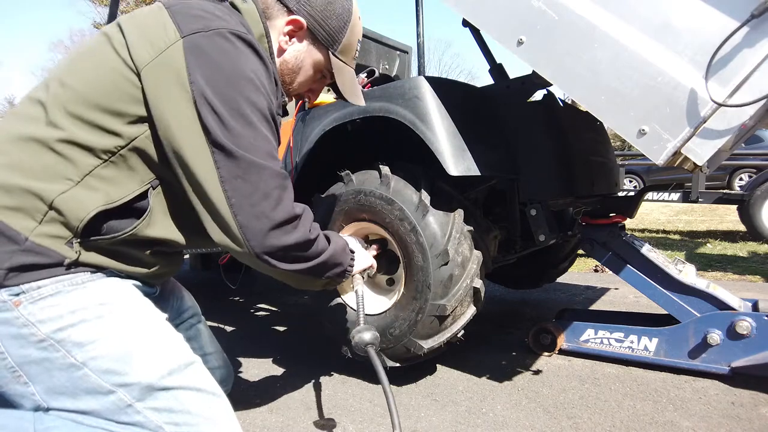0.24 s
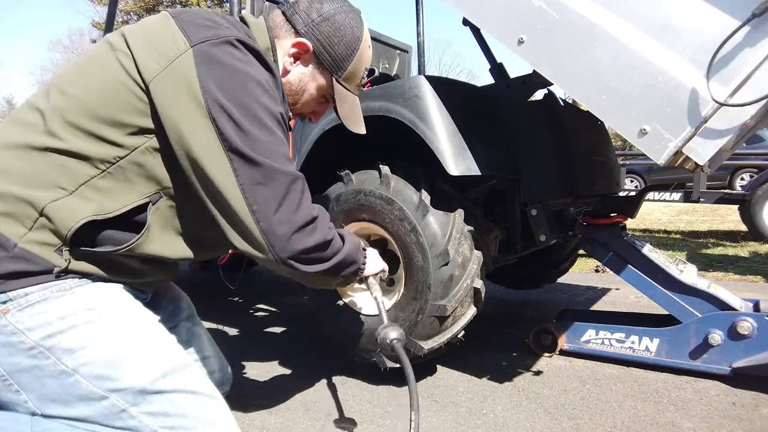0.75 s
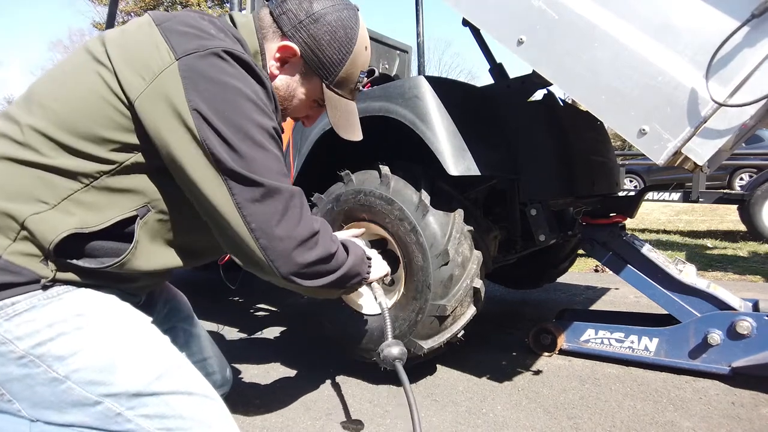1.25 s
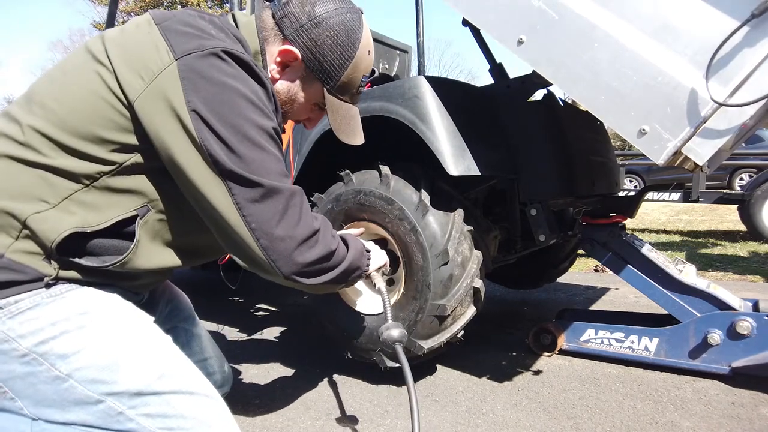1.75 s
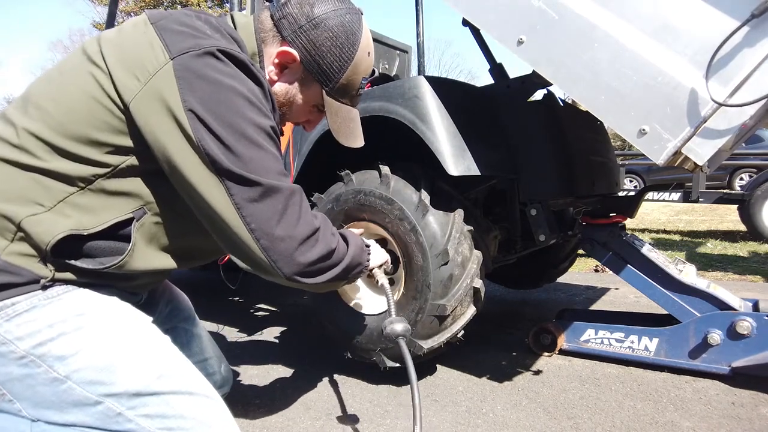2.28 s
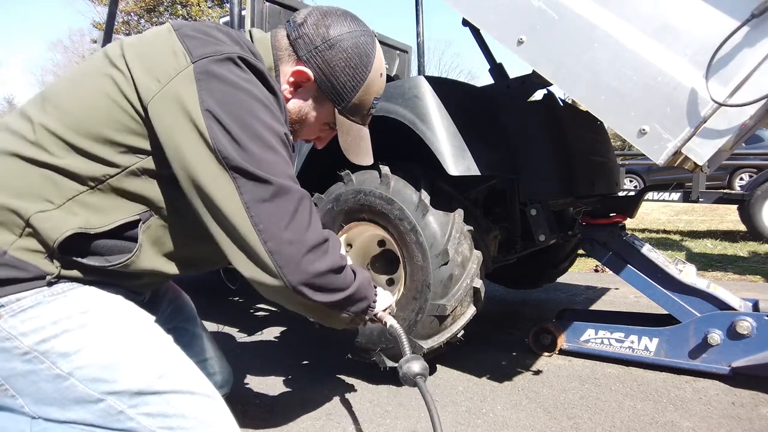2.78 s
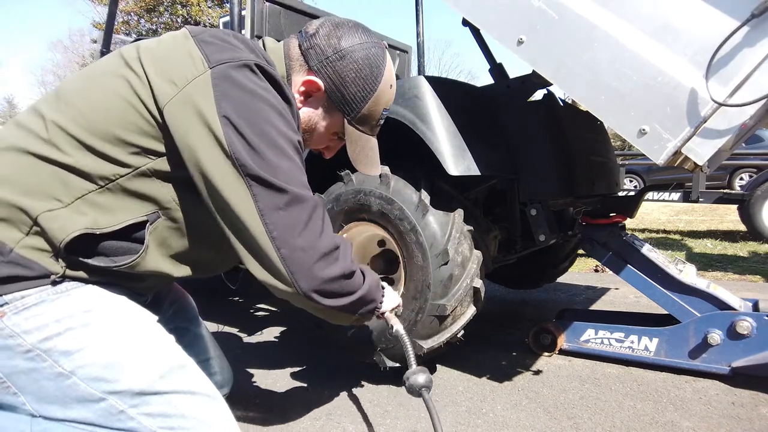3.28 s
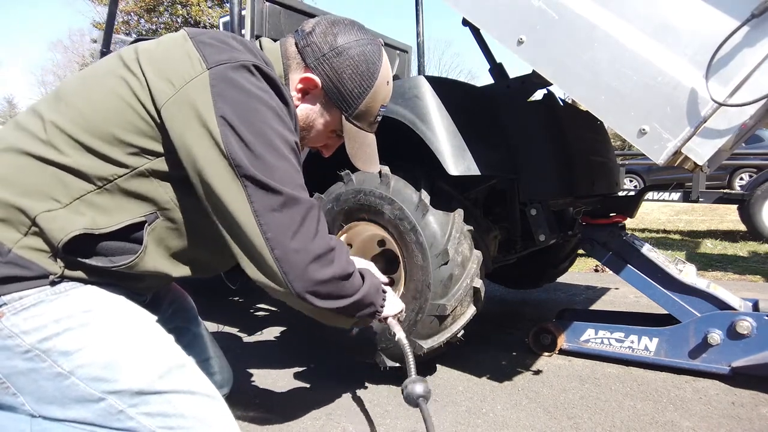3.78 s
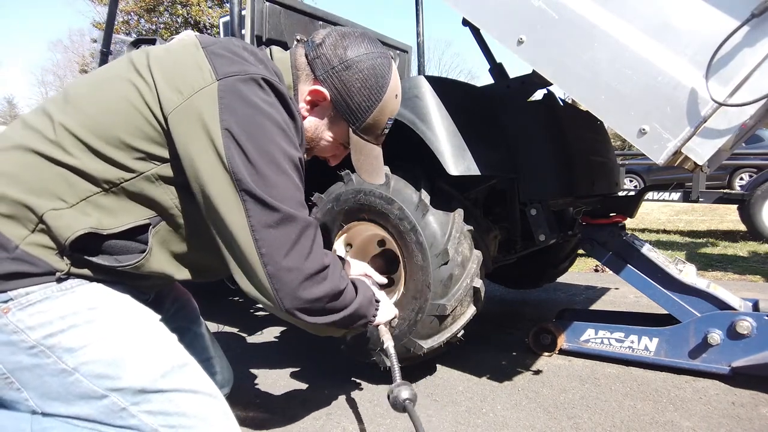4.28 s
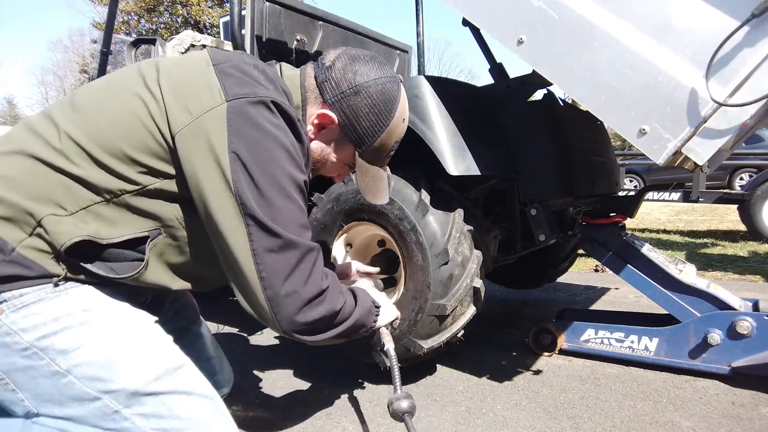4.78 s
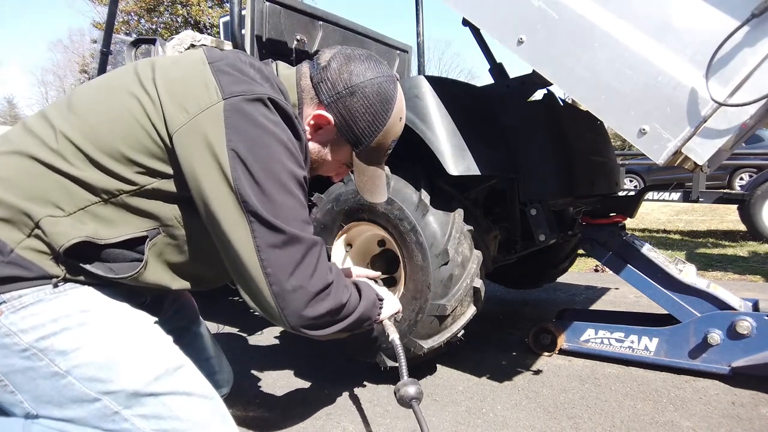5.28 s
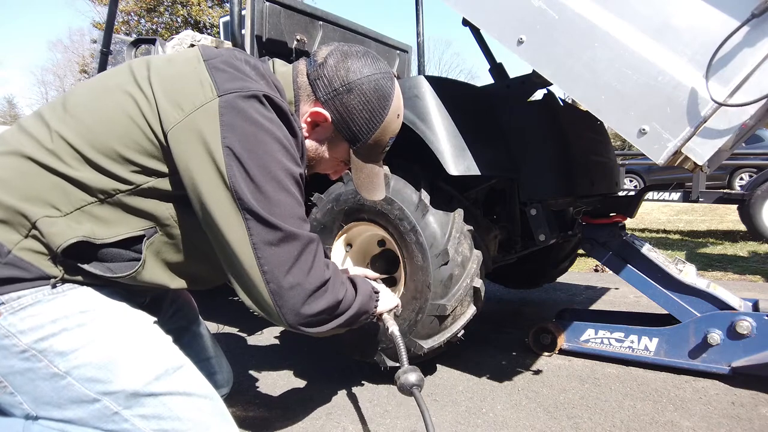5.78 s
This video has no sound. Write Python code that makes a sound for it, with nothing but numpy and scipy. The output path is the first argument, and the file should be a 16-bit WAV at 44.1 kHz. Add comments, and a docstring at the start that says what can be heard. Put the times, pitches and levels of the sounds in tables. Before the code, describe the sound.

Close, dry outdoor work on a small tyred wheel. Light clicks and clacks of nut and socket come first, with a thin distant bird whistle. Then an air wrench blasts in two short whirring pulls and a half-second run of fast hammering. Quieter thuds, scrapes and ticks follow for over two seconds, before one last harsh burst hammers to the end. A low breeze rumbles on the microphone.

```python
"""On a driveway outdoors, an air wrench runs lug nuts onto a steel wheel in three bursts.
Its vane motor puffs and hisses: vane impulses drive low puffs, and coloured noise makes the moving air.
The motor whirs while a nut turns; on a tight nut it restarts after each blow. Blows are noise cracks,
falling clangs and fading wheel tones. Around them nuts and socket click and scrape, a sleeve brushes,
a bird whistles and a breeze rumbles on the microphone. Short echoes follow the work."""
import sys
import numpy as np
from scipy import signal
from scipy.fft import rfft, irfft, next_fast_len
from scipy.io import wavfile
from scipy.ndimage import uniform_filter1d, map_coordinates

SR = 44100
rng = np.random.default_rng(int(sys.argv[2]) if len(sys.argv) > 2 else 0)


def generate_wav(sig):
    """Save sig (samples, or channels by samples) to the path in sys.argv[1] as 16-bit PCM at SR."""
    pcm = np.round(np.clip(np.atleast_2d(sig).T, -1, 1) * 32767).astype(np.int16)
    wavfile.write(sys.argv[1], SR, pcm)


N = 266364
T = np.arange(N) / SR  # time in the scene (s)
AGE = np.arange(SR // 2) / SR  # time since a short sound began (s)


def amp(db):
    """Turn decibels into a gain."""
    return 10 ** (np.asarray(db) / 20)


def unit(x):
    """Scale a sound to rms 1."""
    return x / np.sqrt(np.mean(x ** 2) + 1e-20)


def along(points, hz):
    """Read a curve of (frequency, value) points, spaced by the log of frequency."""
    point_hz, values = np.transpose(points)
    return np.interp(np.log(hz + 1), np.log(point_hz + 1), values)


def curves(rows):
    """Give one value per sample for each column after the time."""
    times, *columns = np.transpose(rows)
    return [np.interp(T, times, column) for column in columns]


def filtered(x, response):
    """Multiply the spectrum of x by a response, a function of frequency."""
    size = next_fast_len(len(x) + 8192)
    hz = np.fft.rfftfreq(size, 1 / SR)
    return irfft(rfft(x, size) * response(hz), size)[:len(x)]


def noise(spectrum, size=N):
    """Make coloured noise of rms 1; only the shape of the spectrum counts."""
    return unit(filtered(rng.standard_normal(size), lambda hz: amp(along(spectrum, hz))))


def band(lo_hz, hi_hz, size=N, order=3):
    """Make noise of rms 1 in a band with soft skirts."""
    def response(hz):
        detune = (hz ** 2 - lo_hz * hi_hz) / ((hz + 1) * (abs(hi_hz - lo_hz) + 1))
        return 1 / np.sqrt(1 + np.abs(detune) ** (2 * order))
    return unit(filtered(rng.standard_normal(size), response))


def causal(spectrum, size=4096):
    """Build a minimum-phase impulse response: this spectrum, sounding as early as it can."""
    hz = np.fft.rfftfreq(size, 1 / SR)
    cepstrum = irfft(np.log(amp(along(spectrum, hz))))
    fold = np.r_[1, np.full(size // 2 - 1, 2), np.zeros(size // 2)]
    return irfft(np.exp(rfft(cepstrum * fold)))


def chamber(spectrum):
    """Give a minimum-phase response of energy 1."""
    response = causal(spectrum)
    return response / np.linalg.norm(response)


def burst(carrier, attack, t60):
    """Let a carrier swell and die, with an energy set by its envelope alone."""
    shape = (1 - np.exp(-AGE / attack)) * amp(-60 * AGE / t60)
    return carrier * shape * np.linalg.norm(shape) / np.linalg.norm(carrier * shape)


def ring(modes, spread_db=2):
    """Sum fading tones, one a mode, struck at new strengths each time."""
    out = np.zeros(len(AGE))
    for hz, db, t60 in modes:
        level = amp(db + spread_db * rng.standard_normal() - 60 * AGE / t60)
        out += level * np.sin(2 * np.pi * (hz * AGE + rng.random()))
    return out


def add(track, s, sound):
    """Mix a sound in at time s."""
    part = track[max(round(s * SR), 0):][:len(sound)]
    part += sound[:len(part)]


def arch(s, length):
    """Rise smoothly from 0 to 1 and fall back."""
    return np.sin(np.pi * np.clip((T - s) / length, 0, 1))


def wobble(rate):
    """Draw a smooth random curve through `rate` random points a second."""
    return map_coordinates(rng.standard_normal(400), [T * rate], mode="wrap")


# how strong the breeze is: (time [s], relative buffet level [dB], relative flutter level [dB])
BREEZE_LEVELS = [(0.0, -31, -50), (0.12, -37, -64), (0.25, -33, -49), (0.55, -29.5, -74),
                 (0.77, -28.5, -43), (1.01, -30.5, -46.5), (1.16, -24, -56), (1.51, -40.5, -58.5),
                 (2.05, -42.5, -45), (2.37, -44, -63), (2.44, -48, -63), (3.38, -37.5, -60),
                 (3.62, -29, -71), (3.8, -38, -57), (4.39, -30.5, -37.5), (4.46, -34, -48),
                 (5.58, -37.5, -50.5), (6.04, -33.5, -53)]
# colour of the slow, deep buffets: (frequency [Hz], relative level [dB per Hz])
BUFFET_COLOUR = [(4, -25.5), (12, 9.5), (21, -5), (35, -4.5), (70, -17.5), (100, -48.5), (140, -48),
                 (200, -59), (440, -91.5), (2000, -130)]
# colour of the faster flutter: (frequency [Hz], relative level [dB per Hz])
FLUTTER_COLOUR = [(40, -25), (85, 0.5), (120, -9), (170, -21.5), (250, -35.5), (500, -64), (2000, -120)]
EDDY_RATE, EDDY_DB = 16, 3.5  # quick random swells: points a second, typical depth (dB)


def breeze(wind_db=4, flutter_db=-4):
    """Air pushes on the microphone: two bands of low noise swell and sink unevenly."""
    buffet_level, flutter_level = curves(BREEZE_LEVELS)
    buffets = amp(buffet_level + wind_db) * noise(BUFFET_COLOUR)
    flutter = amp(flutter_level + flutter_db) * noise(FLUTTER_COLOUR)
    return amp(EDDY_DB * wobble(EDDY_RATE)) * (buffets + flutter)


# the background hiss sinks while the first bursts go on, then slowly comes back:
# (time [s], relative level [dB])
BACKGROUND_LEVELS = [(1.2, -68), (2.6, -83), (5.0, -74)]
# colour of the background hiss: (frequency [Hz], relative level [dB per Hz])
BACKGROUND_COLOUR = [(110, -39.5), (180, 2), (452, -21.5), (793, -26), (1070, -29), (1180, -18.5),
                     (1240, -28.5), (4810, -32.5), (14300, -38.5), (16000, -41)]


def background_hiss(background_db=3):
    """Faint coloured noise lies behind everything; its level sinks, then slowly comes back."""
    background_level, = curves(BACKGROUND_LEVELS)
    return amp(background_level + background_db) * noise(BACKGROUND_COLOUR)


# brushes of the sleeve as the arm moves: (time [s], length [s], relative level [dB])
ARM_MOVES = [(0.29, 0.18, -59), (0.69, 0.49, -60), (3.55, 0.56, -79), (4.696, 0.24, -55)]
# colour of the rubbing cloth: (frequency [Hz], relative level [dB])
CLOTH_COLOUR = [(120, -28), (230, 4), (400, -0.5), (620, -7.5), (900, -6.5), (2000, -23), (5000, -34)]
SLEEVE_REST_DB = -74.5  # relative level while the arm is nearly still


def jacket_sleeve(sleeve_db=-2):
    """Cloth rubs on cloth: dull noise that swells as the arm moves."""
    brushing = amp(SLEEVE_REST_DB) + sum(amp(db) * arch(s, length) for s, length, db in ARM_MOVES)
    return amp(sleeve_db) * brushing * noise(CLOTH_COLOUR)


# socket and nuts sliding over the studs: (time [s], length [s], level [dB])
SLIDES = [(.0, 0.09, -76), (0.337, 0.12, -69), (0.505, 0.02, -70), (2.602, 0.093, -69.5),
          (2.703, 0.056, -53), (3.229, 0.043, -56.5), (3.489, 0.036, -68), (3.575, 0.04, -68),
          (4.34, 0.019, -72.5), (4.428, 0.045, -70), (4.747, 0.11, -58.5)]
# colour of sliding steel: (frequency [Hz], relative level [dB])
SLIDE_COLOUR = [(200, -1), (600, -6), (1000, -5), (1550, 9.5), (2200, 6), (2900, -1.5), (4400, 4),
                (6000, -16.5), (9000, -19), (15000, -38)]


def scraping(grain_db=4):
    """Steel slides on steel in tiny uneven slips, heard as grainy noise."""
    strokes = sum(amp(db) * np.sqrt(np.abs(arch(s, length))) for s, length, db in SLIDES)
    slips = amp(grain_db * unit(uniform_filter1d(rng.standard_normal(N), size=120)))
    return strokes * unit(slips * noise(SLIDE_COLOUR))


# the hollow bump of wheel and tyre: (frequency [Hz], relative level [dB], T60 [s])
TYRE_MODES = [(225, 0.5, 0.22), (241, 4, 0.16), (350, -8, 0.2), (585, -16.5, 0.04)]


def tyre_bump():
    """The hollow tyre answers a shove with a few low tones that die fast."""
    tones = sum(amp(db - 60 * AGE / t60) * np.sin(2 * np.pi * hz * AGE) for hz, db, t60 in TYRE_MODES)
    return tones * (1 - np.exp(-AGE / 0.0013))


# nuts and socket handled at the wheel: (time [s], then relative levels of
# thud [dB], knock [dB], clack [dB], tick [dB])
CLICKS = [(0.191, -44, -35.5, -43.5, -61), (0.215, -48, -43, -36.5, -23.5), (0.286, -54, -48.5, -50.5, -51),
          (0.342, -36.5, -46.5, -54, -77), (0.393, -43, -49, -48, -72), (0.412, -36.5, -47.5, -49, -53),
          (0.556, -49, -79, -68, -79), (0.729, -48, -63, -63, -77), (0.863, -32, -46, -49.5, -21.5),
          (0.957, -37.5, -76, -76, -81), (1.016, -37.5, -38.5, -39, -77), (2.4, -44, -42, -37, -47),
          (2.431, -52.5, -53.5, -41.5, -51), (2.461, -42, -40, -37, -21), (2.567, -60.5, -57, -56.5, -83.5),
          (2.8, -35, -34, -39.5, -62.5), (2.844, -52, -55.5, -68, -84.5), (3.19, -25.5, -31.5, -40.5, -31),
          (3.244, -43, -47, -52.5, -43), (3.306, -61.5, -55, -60, -72), (3.324, -60, -47.5, -61, -57),
          (3.592, -48.5, -47.5, -62, -68.5), (3.619, -41.5, -44, -61, -54), (3.639, -47.5, -56, -75, -84),
          (3.689, -65, -56.5, -71, -87), (3.907, -57.5, -55, -63, -72), (3.997, -53, -52.5, -57.5, -77),
          (4.523, -48.5, -57.5, -58.5, -81), (4.624, -61, -63, -66, -65.5), (4.664, -46, -46, -39.5, -31.5),
          (4.725, -41.5, -53, -57.5, -77), (4.769, -43, -45.5, -46.5, -34.5), (4.792, -45, -58, -56, -37),
          (4.811, -33.5, -43.5, -42, -72), (4.832, -57, -51, -63, -76), (4.883, -67, -47, -62.5, -61)]
# how thud, knock, clack and tick sound: (low edge [Hz], high edge [Hz], relative gain [dB], T60 [s])
REGISTERS = [(326, 720, -3.5, 0.074), (970, 1850, -1.5, 0.044), (2060, 4410, 5.5, 0.021),
             (6000, 7100, -16, 0.0089)]
# bright steel contact, also used for the hammer's rebounds: (frequency [Hz], relative level [dB])
TICK_COLOUR = [(300, -12.5), (1500, -17.5), (3000, -3), (4500, -0.5), (6500, -12.5), (9500, 0.5),
               (16000, -24)]
# the steel wheel disc, also rung by the hammer: (frequency [Hz], relative level [dB], T60 [s])
WHEEL_MODES = [(350, 1, .56), (414, -3, .56), (781, -8, .25), (1140, -22, .5), (1400, -10, .12),
               (1782, -8, .45), (2850, -18, .4), (3250, -15, .25), (3720, -17, .4)]
# the socket: (frequency [Hz], relative level [dB], T60 [s])
SOCKET_MODES = [(2960, -7, 0.18), (3534, -7, 0.44), (3930, -14, 0.087), (4550, -24, 0.095)]
# the loose nut: (average frequency [Hz], relative level [dB], T60 [s])
NUT_MODES = [(5981, -10, .15), (7520, 8, 0.035), (8699, -10, 0.13)]
# shoves that shake the tyre: (time [s], relative level [dB])
SHOVES = [(0.861, -41), (0.957, -41), (3.19, -29.5), (3.638, -46.5), (4.725, -45.5), (4.834, -46)]
BUMP_DB = -16  # the tyre's answer to a thud


def handling(wheel_db=-26, nut_db=-29, socket_db=-27, tyre_db=0.0, contact_db=-9, sharp_db=-6):
    """Parts touch in short dry noise bursts; tyre, wheel, socket and loose nut ring after them."""
    out, size = np.zeros(N), len(AGE)
    bump = tyre_bump()
    for s, thud, knock, clack, tick in CLICKS:
        contact = burst(noise(TICK_COLOUR, size), attack=0.00031, t60=0.00577)
        add(out, s, (amp(clack + contact_db) + amp(tick + sharp_db)) * contact)
        for level, (lo, hi, db, t60) in zip((thud, knock, clack, tick), REGISTERS):
            add(out, s, amp(level + db) * burst(band(lo, hi, size=size), attack=0.00029, t60=t60))
        # the nut's ring pitches vary a little at random from click to click
        nut = [(hz * (1 + .015 * rng.standard_normal()), db, t60) for hz, db, t60 in NUT_MODES]
        steel = amp(knock + wheel_db) * ring(WHEEL_MODES)
        steel += amp(clack + socket_db) * ring(SOCKET_MODES)
        steel += amp(tick + nut_db) * ring(nut, spread_db=7)
        add(out, s, amp(thud + BUMP_DB) * bump + steel)
    for s, db in SHOVES:
        add(out, s, amp(db + tyre_db) * bump)
    return out


# a distant bird: (time [s], length [s], starting pitch [Hz], peak level [dB])
WHISTLES = [(0.76, 0.097, 3800, -77), (1.043, 0.14, 3730, -73.5)]
WHISTLE_SAG_HZ_PER_S = 1300


def bird():
    """Thin whistles, each a pure tone that sags in pitch."""
    out = np.zeros(N)
    for s, length, hz, db in WHISTLES:
        cycles = (T - s) * (hz - WHISTLE_SAG_HZ_PER_S * (T - s) / 2)
        out += amp(db) * arch(s, length) * np.sin(2 * np.pi * cycles)
    return out


# the motor while a nut still turns, one list a run: (time [s], vane rate [Hz])
SPINS = [
    [(1.28, 155.5), (1.31, 188.5), (1.375, 351), (1.425, 424.7), (1.436, 330.2), (1.50, 281.2),
     (1.535, 368.5), (1.56, 382), (1.6, 261.3), (1.61, 128.1), (1.655, 212.8), (1.70, 52.43)],
    [(1.847, 114.4), (1.868, 204.9)],
    [(5.128, 96.25), (5.158, 243.5), (5.195, 327.2), (5.205, 247.3), (5.222, 282.7), (5.235, 221.4),
     (5.256, 230.4)],
]


def spinning(s):
    """Tell whether the nut is still loose and turning at time s."""
    return any(spin[0][0] < s < spin[-1][0] for spin in SPINS)


def vane_rate():
    """Count the vanes passing each second while a nut turns."""
    return sum(np.interp(T, *np.transpose(spin), left=0, right=0) for spin in SPINS)


# pulls of the trigger: (pressed [s], released [s], then relative levels of
# vane puffs [dB], hiss [dB], whistling port [dB])
PULLS = [(1.257, 1.409, -31.5, -30.5, -26), (1.482, 1.661, -35.5, -35.5, -28.5),
         (1.831, 2.38, -32, -33, -30.5), (5.109, 5.924, -31, -31.5, -34.5)]
COAST_GAP_S, COAST_SLOWING = 0.016, 1.12  # vane gap as the rotor runs down, and each gap over the last


def vanes(jitter_s=.00002, scatter_db=4.0):
    """Place one impulse for each vane that passes the exhaust port."""
    passed = np.floor(np.cumsum(vane_rate()) / SR)
    times = list(T[1:][np.diff(passed) > 0])
    # on a tight nut each blow stops the rotor; its vane rate then climbs steadily again
    spin_up = 3800  # Hz a second
    blows = blow_times()
    for s, following in zip(blows, np.r_[blows[1:], np.inf]):
        turns = np.arange(1, 8) + rng.uniform(-.15, .15)
        stroke = s + np.sqrt(2 * turns / spin_up)
        times += [t for t in stroke if t < following and not spinning(t)]
    # after a release the rotor runs down
    run_down = np.cumsum(COAST_GAP_S * COAST_SLOWING ** np.arange(9))[3:]
    times += [t for _, released, *_ in PULLS for t in released + run_down if not spinning(t)]
    train = np.zeros(N)
    for s in times:
        add(train, s + jitter_s * rng.standard_normal(), amp(scatter_db * rng.standard_normal(1)))
    return train


def valve(pressed, released, open_s, t60):
    """Open after the press, hold while the trigger is down, then let the air die away."""
    opening = np.clip((T - pressed) / open_s, 0, 1) ** 2
    return opening * amp(-60 * np.maximum(T - released, 0) / t60)


def hose_surge(pressed):
    """The full hose gives an extra push that sags away."""
    return np.exp(-np.maximum(T - pressed, 0) / SURGE_S)


FULL_SPEED_HZ = 330  # vane rate of the free rotor, counted as speed 1
SURGE_S, PUFF_SURGE_DB, HISS_SURGE_DB, PORT_SURGE_DB = 0.038, 3, 9, 7  # hose's push: time constant, boosts
PORT_OPEN_S, HISS_OPEN_S, ROTOR_START_S = 0.0054, .024, .034  # the port opens soonest, the rotor last
SHUT_T60, RUN_DOWN_T60 = .1, 0.22  # air and puffs dying after a release (s)
FREE_HISS_DB, FREE_PUFF_DB = 5.5, 2.5  # more air passes at speed 1
COAST_PUFF_DB, COAST_HISS_DB, COAST_PORT_DB = -29, -51, -34  # pumped by the rotor at speed 1, relative
# exhaust chamber: (frequency [Hz], relative level [dB])
PUFF_CHAMBER = [(60, -33.5), (130, -2), (200, -1), (400, -1.5), (580, -11.5), (780, -13.5), (1200, -19),
                (1700, -19), (2600, -35.5), (8000, -48.5)]
# housing, rung by the sharp edge of a fast puff: (frequency [Hz], relative level [dB])
HOUSING = [(300, -20.5), (600, -15.5), (900, 6.5), (1250, 7.5), (1650, 5), (2000, -13), (2800, -21.5),
           (8000, -55)]


def motor_puffs(train, speed, free, puff_db=-2.5, whine_db=-7.0):
    """Each vane lets out a low puff; the faster the rotor, the more its edge rings in the housing."""
    edge = signal.fftconvolve(train * speed, chamber(HOUSING))[:N]
    puffs = signal.fftconvolve(train, chamber(PUFF_CHAMBER))[:N]
    # even out the loudness, so that the trigger sets the level
    power = np.abs(uniform_filter1d(puffs ** 2, size=2000))
    motor = (puffs + amp(whine_db) * edge) / np.sqrt(power + 0.035 * power.max())
    drive = np.zeros(N)
    for pressed, released, puff_level, _, _ in PULLS:
        level = puff_level + PUFF_SURGE_DB * hose_surge(pressed) + FREE_PUFF_DB * free
        drive += amp(level) * valve(pressed, released, ROTOR_START_S, RUN_DOWN_T60)
    return amp(puff_db) * np.hypot(drive, amp(COAST_PUFF_DB) * free) * motor


def stalls(choke_db=-0.5, lag_s=0.021, width_s=0.012):
    """The rotor stands still just after a blow and chokes the air a little."""
    choke = np.zeros(N)
    for s in blow_times():
        add(choke, s, np.exp(-((AGE - lag_s) / width_s) ** 2))
    return amp(choke_db * choke)


# exhaust hiss in the first two pulls and from the rotor's own pumping:
# (frequency [Hz], relative level [dB per Hz])
HISS_FIRST = [(200, -22), (500, 0.5), (850, -24), (1600, -6), (2200, -4.5), (2750, -19), (3700, -1.5),
              (4500, -6), (5600, -10.5), (8000, -8), (10200, -9.5), (11500, -18.5), (16000, -19)]
# exhaust hiss in the third pull: (frequency [Hz], relative level [dB per Hz])
HISS_THIRD = [(200, -6.5), (550, 0.5), (900, -22), (1700, -5), (2700, -11.5), (3100, -2.5), (4500, -3),
              (5500, -6.5), (7300, -14), (7900, -8), (10000, -10), (11500, -17), (16000, -21.5)]
# exhaust hiss in the last pull: (frequency [Hz], relative level [dB per Hz])
HISS_LAST = [(200, -2.5), (800, -3.5), (1400, -9.5), (2650, -4), (3050, 0), (3500, -9.5), (4900, 1.5),
             (5900, -10), (7400, -10), (8000, -5), (9200, -5), (11500, -15.5), (12400, -9.5),
             (13200, -11.5), (16000, -21)]


def exhaust_air(train, free, hiss_db=2.5, port_db=-4.5, port_hz=4050, port_width_hz=650, chop=0.55,
                gust_t60=0.041):
    """Air rushes out as noise that the vanes chop into gusts; the port whistles in the jet."""
    gusts = signal.fftconvolve(train, amp(-60 * AGE / gust_t60))[:N]
    flow = (1 + chop * (gusts - uniform_filter1d(gusts, size=600))) * stalls()
    # a spinning rotor pumps some air by itself; each pull adds the hose's pressure
    whistle = amp(COAST_PORT_DB) * free ** 2
    jet = amp(COAST_HISS_DB) * free ** 2 * noise(HISS_FIRST)
    colours = (HISS_FIRST, HISS_FIRST, HISS_THIRD, HISS_LAST)
    for (pressed, released, _, hiss_level, port_level), colour in zip(PULLS, colours):
        surge = hose_surge(pressed)
        hiss_gain = amp(hiss_level + HISS_SURGE_DB * surge + FREE_HISS_DB * free)
        jet += hiss_gain * valve(pressed, released, HISS_OPEN_S, SHUT_T60) * noise(colour)
        port_gain = amp(port_level + PORT_SURGE_DB * surge)
        whistle += port_gain * valve(pressed, released, PORT_OPEN_S, SHUT_T60)
    port = whistle * band(port_hz - port_width_hz / 2, port_hz + port_width_hz / 2, order=2)
    return flow * (amp(hiss_db) * jet + amp(port_db) * port)


def exhaust():
    """The same passing vanes drive both the puffs and the gusts of air."""
    train, speed = vanes(), vane_rate() / FULL_SPEED_HZ
    free = np.abs(uniform_filter1d(speed, size=600))
    return motor_puffs(train, speed, free) + exhaust_air(train, free)


SETTLING = .55  # share of the hurry left after each blow


def steady_times(first, end, period, hurry):
    """Blows on a tight nut start quick and settle to an even beat."""
    k = np.arange(int((end - first + hurry) / period) + 1)
    return first + period * k - hurry * (1 - SETTLING ** k)


# stray blows, most while a nut still runs down its stud:
# (time [s], relative crack level [dB], clang pitch [Hz], relative clang level [dB])
STRAY_BLOWS = [(1.2911, -7, 1881, -28), (1.2964, -1, 2435, -15), (1.3286, 1, 1193, -37.5),
               (1.3745, -1.5, 1870, -24.5), (1.4279, -9.5, 2360, -14.5), (1.4958, -3, 2980, -18.5),
               (1.5385, -1.5, 1690, -15), (1.5721, -15, 2100, -13.5), (1.5985, -7.5, 2560, -16),
               (1.6543, -4.5, 2411, -18), (1.8552, -24.5, 2380, -41.5), (5.1614, -1, 1264, -14),
               (5.1985, -5.5, 1620, -19.5), (5.225, -5.5, 1562, -24), (5.2549, -2.5, 1440, -13)]
# steady hammering on a tight nut: (first blow [s], end [s], settled period [s],
# time gained by the quicker first blows [s], first rebound delay [s])
HAMMERING = [(1.8647, 2.39, .0574, .0142, .0258), (5.3102, 5.95, .0567, .0046, .030)]


def blow_times():
    """List every moment the hammer meets the anvil, in order."""
    stray = [s for s, *_ in STRAY_BLOWS]
    return np.sort(np.concatenate([stray] + [steady_times(*run[:4]) for run in HAMMERING]))


# how each steady run sounds, before scatter: (relative crack level [dB], clang pitch [Hz],
# relative clang level [dB], clang glide [share of pitch], relative first rebound level [dB],
# rebound fade [dB a blow])
HAMMER_TONE = [(-4.5, 1300, -21, 2, -7, 1.75), (-5, 1200, -16.5, 0.79, -13.5, 11)]
STRAY_GLIDE = 0.48  # share by which a stray blow's clang starts sharp
REBOUND_SOONER_S = .0011  # each rebound follows its blow sooner than the last by this much
BLOW_SCATTER_DB, CLANG_SCATTER = 0.46, .11  # typical scatter: level, and share of the clang's pitch


def strikes():
    """List blows (s, crack dB, clang Hz, clang dB, glide) and rebounds (s, dB); force varies a little."""
    blows, rebounds = [(*row, STRAY_GLIDE) for row in STRAY_BLOWS], []
    for (*timing, delay), tone in zip(HAMMERING, HAMMER_TONE):
        db, hz, clang_db, glide, rebound_db, fade_db = tone
        for k, s in enumerate(steady_times(*timing)):
            force, pitch, clang, bounce = rng.uniform(-1.7, 1.7, 4)
            crack_level = db + BLOW_SCATTER_DB * force
            clang_hz = hz * np.exp(CLANG_SCATTER * pitch)
            blows.append((s, crack_level, clang_hz, clang_db + BLOW_SCATTER_DB * clang, glide))
            rebound_level = rebound_db - fade_db * k + 2 * BLOW_SCATTER_DB * bounce
            rebounds.append((s + delay - REBOUND_SOONER_S * k, rebound_level))
    return blows, rebounds


# crack of socket and anvil: (frequency [Hz], relative level [dB])
CRACK_COLOUR = [(150, -20.5), (500, -13.5), (1000, -1), (1600, -11.5), (2400, -3.5), (3200, -5.5),
                (4300, 4.5), (5500, -9), (7000, -8.5), (9000, -6.5), (12000, -12), (16000, -20)]


def hammer(crack_db=-5.5, clang_db=-1, wheel_db=-46, loose_db=-14, rebound_db=-6, glide_s=0.002,
           clang_t60=0.037):
    """A blow cracks the socket and sends a falling clang through the wheel; the hammer bounces back."""
    out, size = np.zeros(N), len(AGE)
    blows, rebounds = strikes()
    steel = noise(CRACK_COLOUR, size)  # the dense modes of socket and anvil, alike from blow to blow
    for s, db, hz, clang_level, glide in blows:
        crack = burst(unit(1.3 * steel + noise(CRACK_COLOUR, size)), attack=0.0015, t60=0.021)
        # high bending waves arrive first, so the pitch falls; a random drift roughens it
        cycles = hz * (AGE + glide * glide_s * (1 - np.exp(-AGE / glide_s)))
        cycles += .02 * np.cumsum(rng.standard_normal(size))
        clang = burst(np.sqrt(2) * np.sin(2 * np.pi * cycles), attack=0.00059, t60=clang_t60)
        # a loose nut passes little on
        wheel = amp(wheel_db + loose_db * spinning(s)) * ring(WHEEL_MODES)
        add(out, s, amp(db) * (amp(crack_db) * crack + wheel) + amp(clang_level + clang_db) * clang)
    for s, db in rebounds:
        tick = burst(noise(TICK_COLOUR, size), attack=0.00017, t60=.02)
        add(out, s, amp(db + rebound_db) * tick)
    return out


# how long the yard's faint tail lasts: (frequency [Hz], T60 [s])
YARD_TAIL = [(200, 0.58), (1500, 0.34), (4000, 0.25), (8000, .25), (15000, 0.13)]


def echoes(x, near_db=-12, far_db=-21):
    """Quick scatter from ground and vehicle, then a faint tail from the yard, both as fading noise."""
    hz, t, grid = signal.stft(rng.standard_normal(len(AGE)), SR, nperseg=256)
    fading = grid * amp(-60 * t / along(YARD_TAIL, hz)[:, None])
    far = signal.istft(fading, SR, nperseg=256)[1][:len(AGE)] * (AGE > .012)
    near_t60 = .07  # s
    near = rng.standard_normal(len(AGE)) * amp(-60 * AGE / near_t60) * (AGE > .002)
    response = amp(near_db) * near / np.linalg.norm(near) + amp(far_db) * far / np.linalg.norm(far)
    return signal.fftconvolve(x, response)[:N]


def scene():
    """Everything reaches one microphone, heard on both channels."""
    work = scraping() + handling() + exhaust() + hammer()
    surroundings = breeze() + background_hiss() + jacket_sleeve() + bird()
    return np.tile(work + echoes(work) + surroundings, (2, 1))


TOP_HZ = 15850


def record(dry):
    """Cut the treble very steeply above TOP_HZ."""
    def cut(hz):
        return 1 / np.sqrt(1 + (hz / TOP_HZ) ** 300)
    return np.array([filtered(channel, cut) for channel in dry])


dry = scene()
out = record(dry)
generate_wav(out)
```